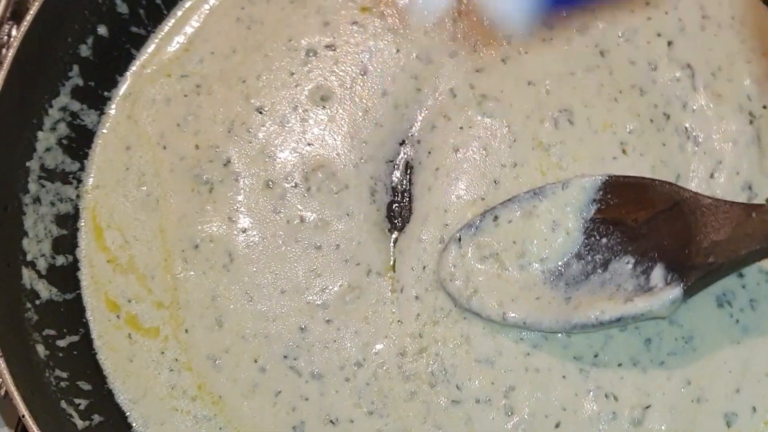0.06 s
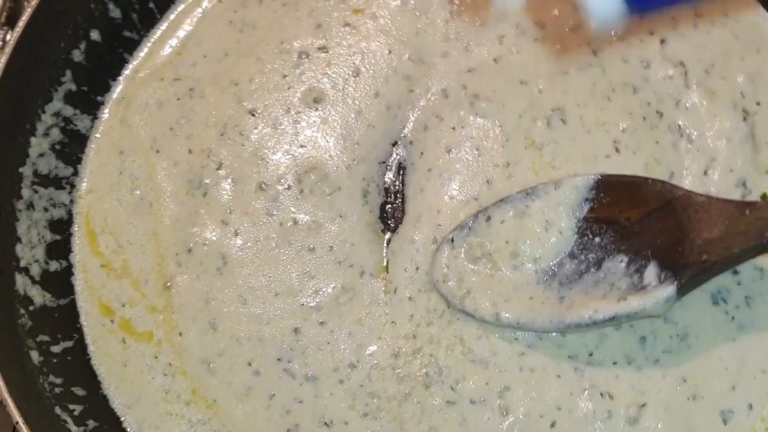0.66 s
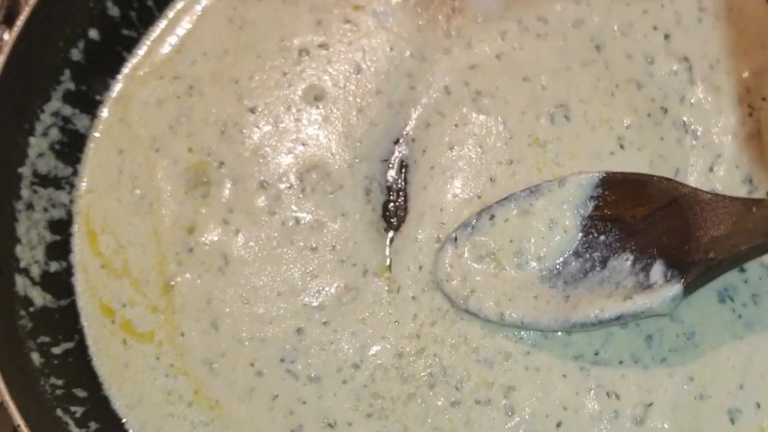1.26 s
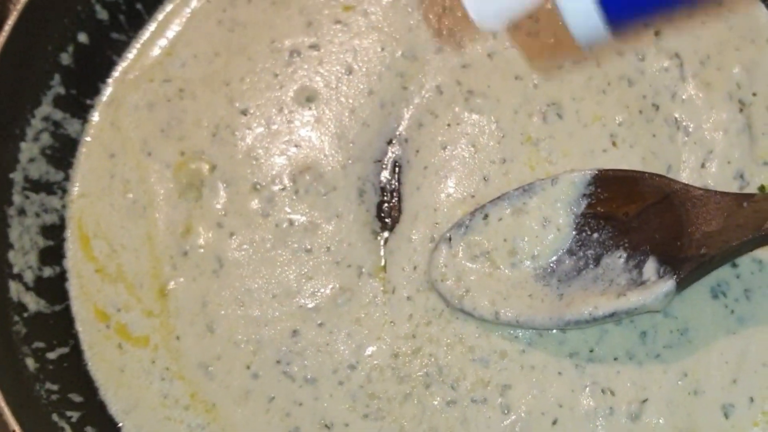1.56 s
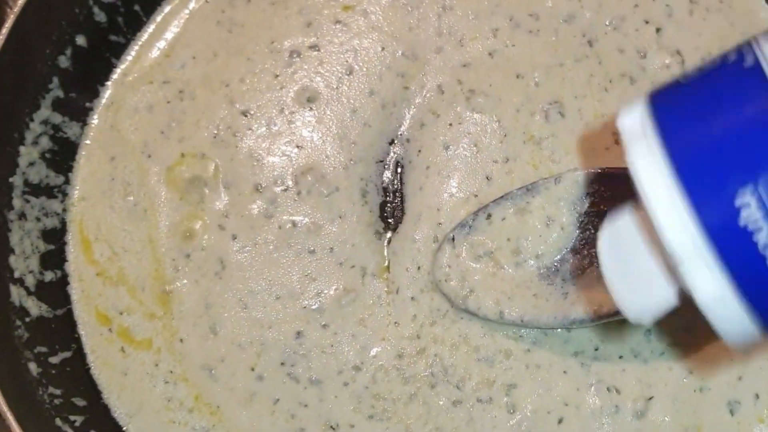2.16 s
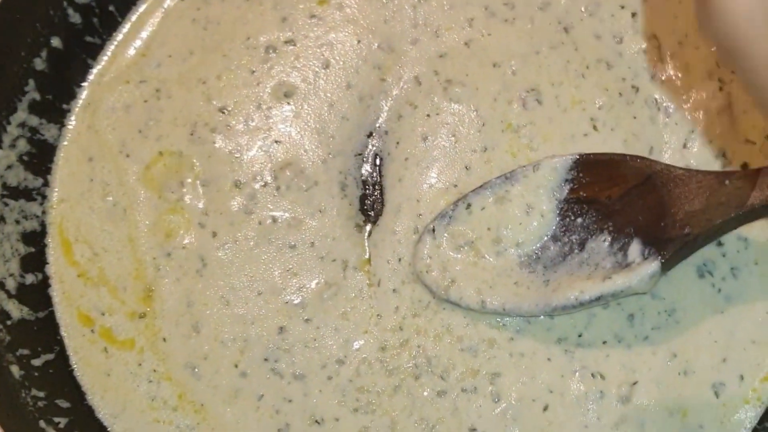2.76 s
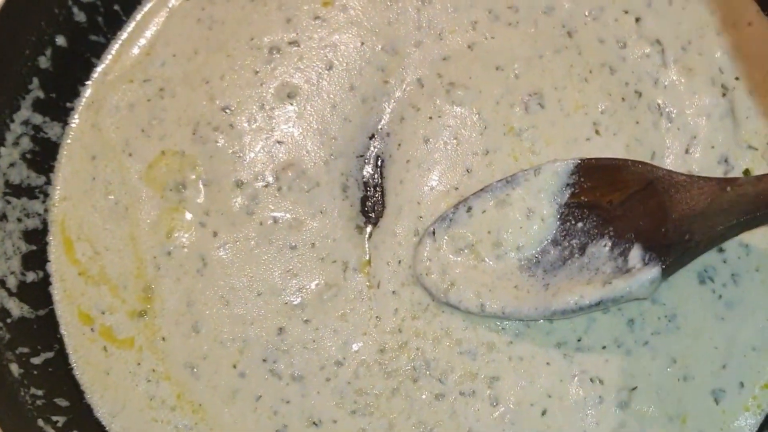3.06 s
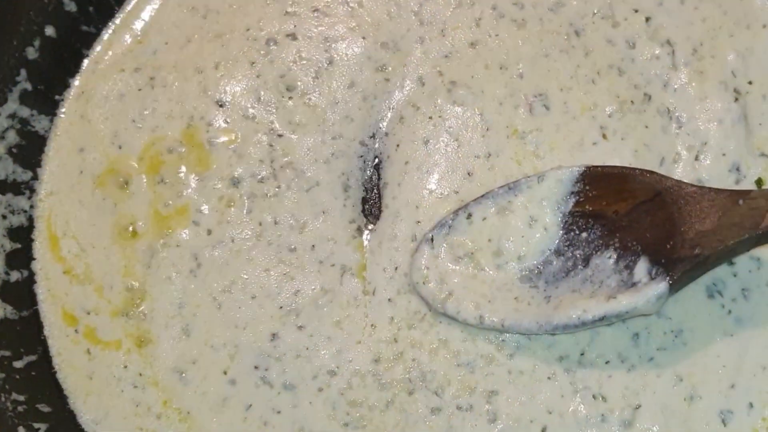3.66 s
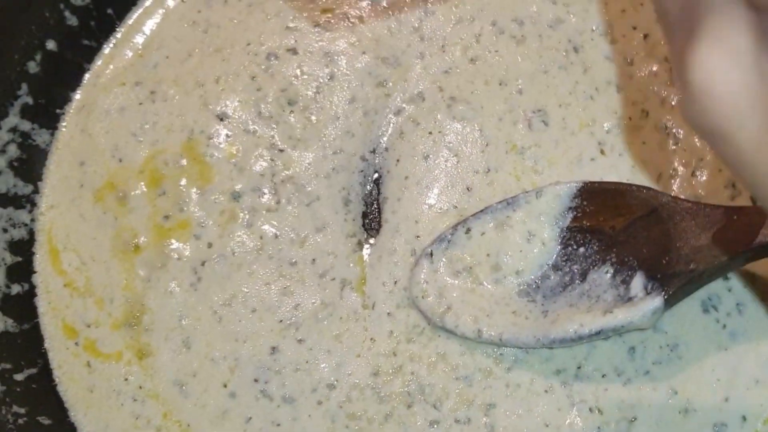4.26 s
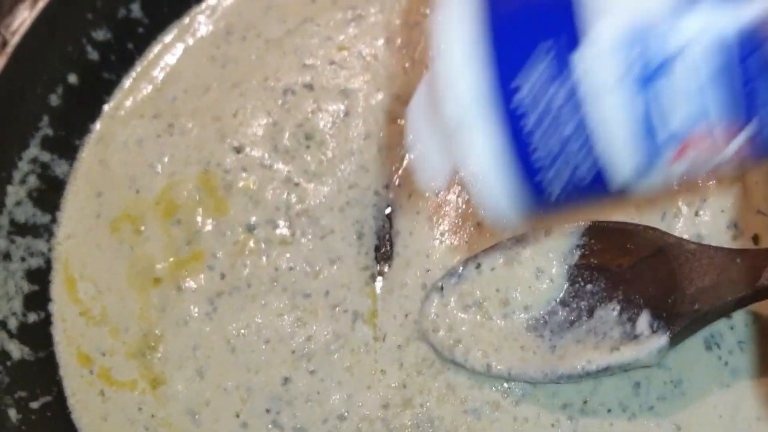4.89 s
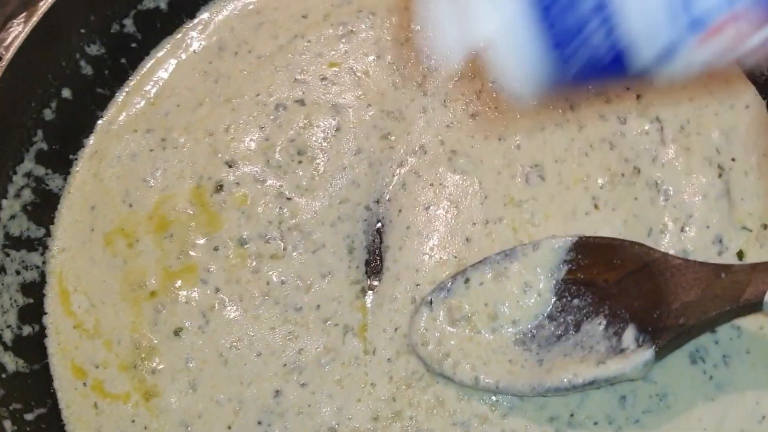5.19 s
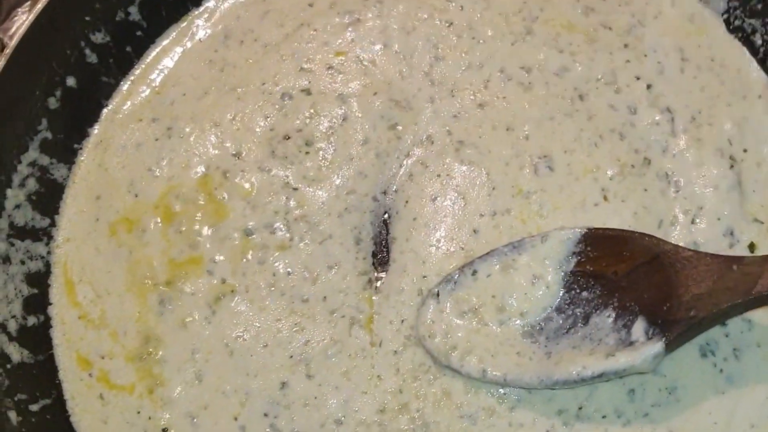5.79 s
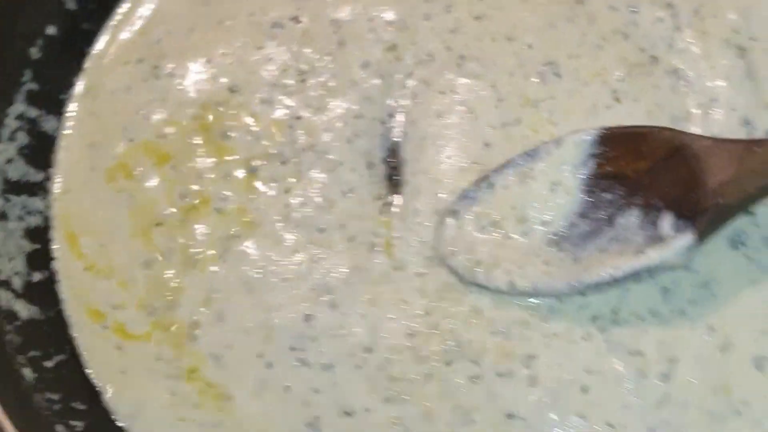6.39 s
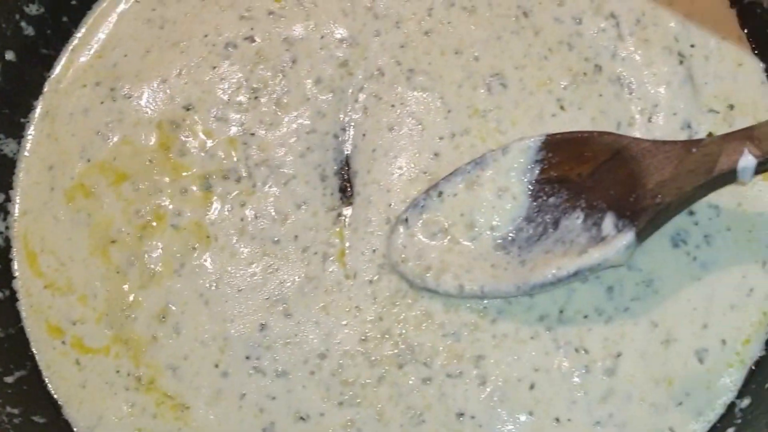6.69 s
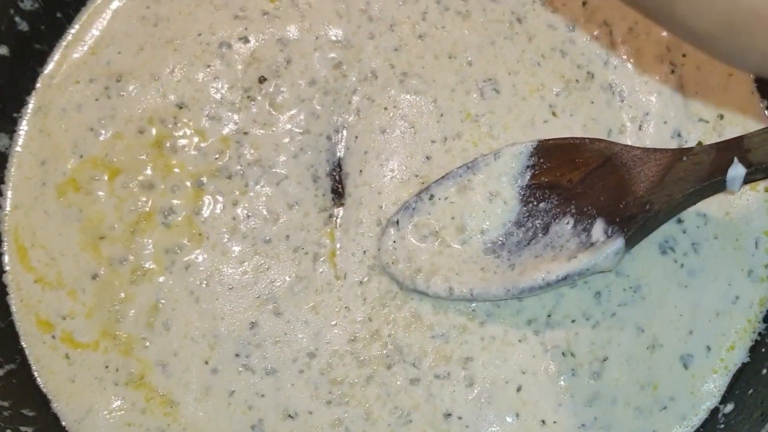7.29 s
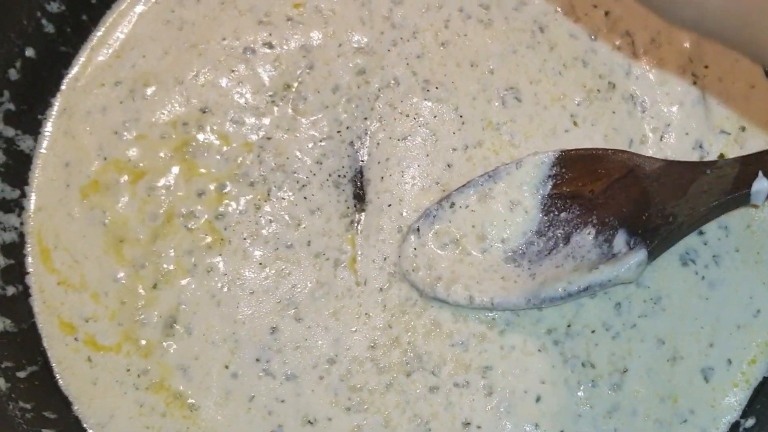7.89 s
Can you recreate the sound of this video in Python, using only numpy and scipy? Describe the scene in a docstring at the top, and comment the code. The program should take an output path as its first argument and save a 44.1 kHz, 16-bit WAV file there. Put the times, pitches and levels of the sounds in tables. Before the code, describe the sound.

In a home kitchen, salt is shaken from a tub close to the microphone, about ten gritty strokes a second. The shaking stops, a hand rubs and bumps the microphone, and a second round follows with a few sharp clacks of clumps. After another bump, a pan of cream sauce is left sizzling finely with small bubble pops. An appliance hums low throughout.

```python
"""Salting a simmering sauce

Salt is shaken from a tub, about ten strokes a second in two rounds: at each stroke the grains shower
against the wall and ring the hollow. Below it a pan of cream sauce sizzles finely and its bubbles pop,
while a kitchen appliance hums and rumbles behind. Twice the hand that holds the phone shifts its grip,
rubbing the case and bumping the right microphone."""
import sys
import numpy as np
from scipy import signal
from scipy.fft import rfft, irfft
from scipy.io import wavfile

SR = 44100
rng = np.random.default_rng(int(sys.argv[2]) if len(sys.argv) > 2 else 0)


def wrap_up_sound(samples):
    """Save the sound to the file named by the first command line argument, as 16-bit audio."""
    columns = np.atleast_2d(samples).T
    # keep every value between -1 and 1, then stretch to whole-number steps
    tamed = np.clip(columns, -1, 1)
    steps = np.round(tamed * 32767).astype(np.int16)
    wavfile.write(sys.argv[1], SR, steps)


N = 350154
TIME = np.arange(N) / SR


def undb(db):
    """Decibels to gain."""
    return 10 ** (np.asarray(db) / 20)


def unit(x):
    """Scale to rms 1."""
    return x / np.sqrt(np.mean(x ** 2))


def pan(db):
    """Constant-power gains, the left db above the right."""
    return unit(undb(np.array([[db], [-db]]) / 2))


def add(out, s, x):
    """Mix x into out from time s on."""
    i = max(int(s * SR), 0)
    out[..., i:i + x.shape[-1]] += x[..., :max(N - i, 0)]


def colour(x, points):
    """Minimum-phase EQ from (frequency [Hz], left [dB], right [dB]) points."""
    size = 16384
    hz, *sides = np.transpose(points)
    log_f = np.log(np.arange(size // 2 + 1) * SR / size + 1)
    gains = undb([np.interp(log_f, np.log(hz), db) for db in sides])
    cepstrum = irfft(np.log(gains))
    cepstrum[:, 1:size // 2] *= 2
    cepstrum[:, size // 2 + 1:] = 0
    return signal.fftconvolve(x, irfft(np.exp(rfft(cepstrum))), axes=1)[:, :N]


def walk(rate):
    """Smooth random wander of rms 1, about rate turns a second."""
    steps = signal.resample_poly(rng.standard_normal(int(rate * N / SR) + 2), 8, 1)
    return unit(np.interp(TIME * rate * 8, np.arange(len(steps)), steps))


def fade(t, t60):
    """Decay of 60 dB in t60 seconds."""
    return np.exp(-np.log(1000) * t / t60)


def swells(table):
    """Bell-shaped rises and falls from (time [s], level [dB], spread [s]) rows."""
    return sum(undb(db) * np.exp(-((TIME - s) / spread / 2) ** 2) for s, db, spread in table)


def grains(rate, scatter_db):
    """Random clicks of scattered size, rate a second, each with its own strength left and right."""
    out = np.zeros((2, N))
    at = np.flatnonzero(rng.random(N) < rate / SR)
    size, left, right = rng.standard_normal((len(at), 3)).T
    out[:, at] = undb(scatter_db * np.clip(size, -2, 2)) * np.array([left, right])
    return out


def snaps(table, spray_t60, ring_q, crack_db, gain_db, band_hz):
    """Each snap is a sudden, dying spray of tiny impacts that rings a small hollow for a few cycles."""
    out, t = np.zeros((2, N)), TIME[:SR // 10]
    band = signal.butter(2, band_hz, "band", fs=SR, output="sos")
    for s, db, hz, pan_db in table:
        spray = rng.laplace(size=(2, len(t))) * fade(t, spray_t60)
        ring = signal.lfilter(*signal.iirpeak(hz, ring_q, fs=SR), spray)
        snap = signal.sosfilt(band, ring + undb(crack_db) * spray)
        add(out, s, snap / np.abs(snap).max() * undb(db + gain_db) * pan(pan_db))
    return out


# Mains hum and motor orders: (frequency [Hz], level [dB])
HUM_PARTIALS = [(48.4, -52.5), (100, -44), (112.5, -51), (129, -50), (145, -57.5), (194, -67),
                (242.3, -73.5), (290.7, -60.5), (300, -58), (339.1, -58), (387.6, -58.5), (436, -63.5),
                (484.5, -66.5), (532.9, -86), (1550, -87), (1647, -81), (1745, -80), (1892, -87),
                (2035, -81.5)]
# EQ of the rumble and moving air, a faint hiss on top: (frequency [Hz], left [dB], right [dB])
AIR_EQ = [(25, -16, -39), (39.7, -41, -42.5), (59.4, -14, -0.5), (73, -28, -12.5), (97.6, -15, -8.5),
          (106.8, -5.5, -0.5), (129.8, -10.5, -7.5), (169.6, -37.5, -22), (255, -20, -23.5),
          (276, -21.5, -24.5), (673, -30, -27.5), (1300, -50.5, -42.5), (1610, -39.5, -39),
          (2470, -51.5, -44), (2880, -61, -54.5), (6500, -62, -51.5), (7900, -52, -48), (9600, -63, -61),
          (11500, -54.5, -52)]


def appliance(waver_db=-0.5, drift_rad=0.1, pan_db=-5, air_db=-44, mono_below_hz=700):
    """Mains and motor hum waver slightly over a bed of rumbling air, centred in the bass, wide above."""
    hum = 0
    for hz, db in HUM_PARTIALS:
        amplitude = np.sqrt(2) * undb(db + waver_db * walk(3.17))
        hum += amplitude * np.sin(2 * np.pi * (hz * TIME + rng.random()) + drift_rad * walk(2.56))
    centre = signal.lfilter(*signal.butter(1, mono_below_hz, fs=SR), rng.standard_normal(N))
    wide = signal.lfilter(*signal.butter(1, mono_below_hz, "high", fs=SR), rng.standard_normal((2, N)))
    return hum * pan(pan_db) + undb(air_db) * unit(colour(centre + wide, AIR_EQ))


# Swells of the low drone: (time [s], level [dB], spread [s])
DRONE_SWELLS = [(1.36, -37, 0.12), (2.01, -35.5, 0.041), (5.2, -35.5, 0.06), (7.92, -35.5, 0.072)]


def drone(hz=111, pan_db=-5):
    """A low tone comes and goes, beating against the hum."""
    return swells(DRONE_SWELLS) * np.sin(2 * np.pi * (hz * TIME + rng.random())) * pan(pan_db)


# Fingers dragging over the case: (time [s], relative level [dB], spread [s])
FINGER_RUBS = [(3.466, -32.5, 0.011), (3.550, -42.5, 0.019), (3.590, -38.5, 0.02), (6.138, -36.5, 0.021),
               (6.259, -29, 0.0066)]
# EQ of the dull friction: (frequency [Hz], left [dB], right [dB])
RUB_EQ = [(40, -40, 15), (150, -28, 0), (435, -29, -6.5), (647, -19, 3.5), (860, -38, -6),
          (1290, -40, -11.5), (3000, -49, -20.5), (5670, -62, -24.5), (8000, -46, -51), (15000, -64, -65)]


def rubbing(slips_per_s=5000, gain_db=-3):
    """Skin sticks and slips on the case while the grip shifts."""
    friction = unit(colour(grains(slips_per_s, scatter_db=-3), RUB_EQ))
    return friction * swells(FINGER_RUBS) * undb(gain_db)


# Modes of the phone's case: (frequency [Hz], relative level [dB], t60 [s])
CASE_MODES = [(62, -11, 0.038), (95, 3, 0.043), (165, -13, 0.018), (298, 5, 0.022), (453, -4.5, 0.04),
              (810, 5, 0.008), (1420, -4, 0.0074), (4200, -15, .0015)]
# Thuds of the hand: (time [s], peak [dB], contact [ms])
HAND_BUMPS = [(3.447, -20, 1.4), (3.457, -16.5, 0.66), (3.469, -15.5, 0.5), (3.475, -12.5, 2.7),
              (3.541, -15, .7), (3.548, -13.5, 1.07), (3.555, -6.5, 0.64), (3.559, -4, 0.34),
              (3.563, -8.5, 0.98), (3.575, -12, 1.9), (3.608, -24, 2.5), (6.12, -15, 0.96),
              (6.131, -12.5, 1.24), (6.146, -18.5, 0.64), (6.223, -16.5, 1.15), (6.2556, -0.5, 0.46),
              (6.260, 0.5, 0.75), (6.263, -3.5, 2.96)]
# Ticks of slipping skin: (time [s], relative level [dB])
SKIN_TICKS = [(3.5595, -15), (3.563, -23.5), (3.569, -24), (3.574, -21.5), (6.260, -14), (6.269, -14),
              (6.272, -13)]


def bumps(left_db=-27, tick_corner_hz=900, tick_top_hz=5000, tick_gain_db=3):
    """The hand knocks the case's damped modes, duller the longer the contact; slipping skin ticks."""
    out, t = np.zeros(N), TIME[:SR // 8]
    case = sum(undb(db) * fade(t, t60) * np.cos(2 * np.pi * hz * t) for hz, db, t60 in CASE_MODES)
    for s, db, contact_ms in HAND_BUMPS:
        age = t * 1000 / contact_ms
        push = age ** 3 * np.exp(-3 * age)
        thud = signal.fftconvolve(case, push)[:len(t)]
        add(out, s, -thud / np.abs(thud).max() * undb(db))
    slip = np.exp(-2 * np.pi * tick_corner_hz * t)
    tick = signal.lfilter(*signal.butter(2, tick_top_hz, fs=SR), slip)
    for s, db in SKIN_TICKS:
        add(out, s, -undb(db + tick_gain_db) * tick)
    return out * undb([[left_db], [0]])


# Level ride of the simmer: (time [s], relative level [dB])
SIMMER_RIDE = [(0, -56), (1.5, -63.5), (2.9, -57.5), (3.12, -78), (3.4, -83), (3.65, -65.5), (3.9, -67.5),
               (5.8, -57), (6.2, -63), (6.6, -59.5), (7.25, -60.5), (7.7, -53.5), (7.94, -59.5)]
# EQ of the fine fizz: (frequency [Hz], left [dB], right [dB])
SIZZLE_EQ = [(1000, -48, 5.5), (1930, -5, 10), (2880, -14, 8), (4280, -3, 1), (5000, -10, -3),
             (5770, -6, 1.5), (8440, -2.5, 4.5), (10300, -13, -30), (11100, -4, -5.5), (12500, -5, -4),
             (15300, -6, -6)]


def sizzle(bursts_per_s=110, flurry_hz=35, flurry_db=2, patch_db=4.5, froth_db=-6, gain_db=-2):
    """Tiny bubbles burst in flurries at the hot pan, a broad band for each size, over a fine froth."""
    fizz = 0
    for hz in np.linspace(2600, 15500, 18):
        bursts = grains(bursts_per_s, scatter_db=4) * undb(patch_db * walk(flurry_hz))
        fizz += unit(signal.lfilter(*signal.iirpeak(hz, Q=1, fs=SR), bursts))
    froth = undb(froth_db) * rng.standard_normal((2, N))
    simmer_db = np.interp(TIME, *np.transpose(SIMMER_RIDE)) + flurry_db * walk(flurry_hz)
    return unit(colour(unit(fizz) + froth, SIZZLE_EQ)) * undb(simmer_db + gain_db)


def crackle(count=80, over_simmer_db=9, scatter_db=2, centre_hz=8800, pan_db=-5):
    """Middling bubbles burst at random, spread over an octave and riding the level of the simmer."""
    times = (np.arange(count) + rng.random(count)) / count * N / SR
    rows = []
    for s, (size, octaves) in zip(times, rng.random((count, 2)) - .5):
        db = np.interp(s, *np.transpose(SIMMER_RIDE)) + over_simmer_db + scatter_db * size
        rows.append((s, db, centre_hz * 2 ** octaves, pan_db))
    return snaps(rows, spray_t60=0.051, ring_q=3.4, crack_db=-10, gain_db=3, band_hz=(2500, 13800))


# Spot pops in the sauce: (time [s], relative peak [dB], ring [Hz], left minus right [dB])
BUBBLE_POPS = [(1.399, -50, 7130, -4), (3.275, -57, 9000, 0), (3.682, -51, 8120, -4),
               (6.2951, -41, 7500, -7.0), (6.4085, -44.5, 2820, -10), (6.451, -49, 11400, -1),
               (6.528, -45, 7820, -2), (6.5465, -43, 7160, -6.5), (6.6328, -46, 6960, -5),
               (6.809, -45, 8300, -5), (6.956, -44.5, 7900, -7), (7.099, -46.5, 7700, -7),
               (7.1725, -50, 2860, -13), (7.5303, -48.5, 8100, -3), (7.8181, -43, 2730, -2),
               (7.9115, -46, 7300, -1)]


def pops():
    """The largest bubbles burst and spit."""
    return snaps(BUBBLE_POPS, spray_t60=0.08, ring_q=4.1, crack_db=-16, gain_db=3, band_hz=(1400, 13900))


# Hard accents in the shaking: (time [s], relative peak [dB], ring [Hz], left minus right [dB])
CLUMP_HITS = [(1.560, -36.5, 1810, -2), (3.903, -25.5, 8500, -1), (4.632, -27, 6400, -3),
              (5.224, -24, 7500, 0), (5.666, -34, 3270, -5), (5.900, -36.5, 8650, -3),
              (5.945, -34, 2200, 9), (5.958, -31.5, 2930, -2)]


def clumps():
    """Clumps of salt clack in the tub."""
    return snaps(CLUMP_HITS, spray_t60=0.095, ring_q=4.5, crack_db=-10, gain_db=-2, band_hz=(1400, 12000))


# Resonances of the tub: (frequency [Hz], width [Hz], relative level [dB])
TUB_MODES = [(2820, 340, -1), (6300, 400, -3.5), (7700, 900, 4.5)]


def tub_hollow(knocks_per_s=1200):
    """Knocking grains keep the hollow of the tub ringing."""
    knocks = grains(knocks_per_s, scatter_db=-1)
    return unit(sum(undb(db) * signal.lfilter(*signal.iirpeak(hz, hz / width, fs=SR), knocks)
                    for hz, width, db in TUB_MODES))


# Bouts of even shaking: (first throw [s], last throw [s], swings [count], first return [s],
# return over throw [dB], throw spread [s], return spread [s], brightness [dB], tub ring [dB])
SHAKE_BOUTS = [(0.095, 1.178, 6, 0.186, 0, 0.017, 0.015, -0.5, -8.5),
               (1.603, 1.811, 2, 1.733, -6, 0.011, 0.018, 1.5, -19),
               (2.02, 2.981, 6, 2.128, -1, 0.012, 0.012, -1.5, -9),
               (3.914, 4.529, 4, 4.036, -4, 0.014, 0.02, -0.5, -6),
               (4.727, 5.69, 6, 4.838, -0.5, 0.011, 0.018, -2, -10)]
# Vigour of the shaking: (time [s], level [dB])
SHAKE_RIDE = [(0, -48.5), (0.2, -43), (0.4, -41.5), (0.84, -34.5), (1.0, -37), (1.27, -45.5), (1.45, -52),
              (1.85, -47), (2.35, -43.5), (2.8, -46), (2.98, -50.5), (3.1, -74), (3.7, -72), (3.9, -46),
              (4.7, -40.5), (4.9, -47), (5.24, -41), (5.69, -47), (5.85, -81)]


def strokes(return_bright_db=1, pan_db=5.5, scatter_db=1.67):
    """Each swing throws the salt forward and back, never quite evenly: rows like those of TUB_TILTS."""
    rows = []
    for first, last, swings, first_back, back_db, spread, back_spread, bright, ring in SHAKE_BOUTS:
        for s in np.linspace(first, last, round(swings)):
            rows.append((s, 0, spread, bright, ring))
            rows.append((s + first_back - first, back_db, back_spread, bright + return_bright_db, ring))
    ride = np.transpose(SHAKE_RIDE)
    return [(s, np.interp(s, *ride) + db + rng.normal(0, scatter_db), spread, bright, pan_db, ring)
            for s, db, spread, bright, ring in rows]


# Single tilts, where the salt slides once:
# (time [s], level [dB], spread [s], brightness [dB], left minus right [dB], tub ring [dB])
TUB_TILTS = [(1.40, -58.5, 0.038, -1, 6, -12), (1.955, -55, 0.026, -4, 6, -19),
             (3.728, -49, 0.0072, 12, -1, -2), (3.845, -54.5, 0.007, 18, -1, -9),
             (3.943, -46, 0.015, 3, 0, -4), (5.939, -43, 0.016, 1, 4, -4.5),
             (5.976, -36.5, 0.0048, 5, 4, -6.5)]
# EQ of grains hitting the wall: (frequency [Hz], left [dB], right [dB])
SALT_EQ = [(474, -7, 1), (1240, -16, -6.5), (1610, -7.5, -7), (2480, -8.5, -8.5), (2730, -11.5, 2),
           (4800, -3, 1.5), (6260, -5, 3.5), (8200, -17.5, 6.5), (8600, 0, -0.5), (9460, -12.5, -16.5),
           (11130, -5.5, 1.5), (13500, -1, 3.5), (16000, -3, -4)]


def salt(grains_per_s=3500, split_hz=9500, ring_pan_db=-4, settle_t60=0.38, settle_db=-8):
    """At each stroke loose salt hits the wall as a dense shower of clicks, rings the tub and settles."""
    shower = unit(colour(grains(grains_per_s, scatter_db=-1), SALT_EQ))
    top = signal.lfilter(*signal.butter(2, split_hz, "high", fs=SR), shower)
    layers = np.array([shower - top, top, tub_hollow()])
    power = np.zeros((3, 2, N))  # body, top and hollow; left and right
    for s, db, spread, bright_db, pan_db, ring_db in strokes() + TUB_TILTS:
        near = slice(max(int((s - .1) * SR), 0), int((s + .1) * SR))
        stroke = np.exp(-.5 * ((TIME[near] - s) / spread) ** 2) * (undb(db) * pan(pan_db)) ** 2
        power[0, :, near] += stroke * undb(-bright_db)
        power[1, :, near] += stroke * undb(bright_db)
        power[2, :, near] += stroke * (undb(ring_db) * pan(ring_pan_db)) ** 2
    decay = fade(1 / SR, settle_t60) ** 2
    settling = undb(settle_db) ** 2 * signal.lfilter([1 - decay], [1, -decay], power)
    return np.sum(layers * np.sqrt(power + settling), axis=0)


def kitchen(x, t60=0.23, wet_db=-7):
    """Hob, tiles and cupboards return a short, diffuse tail."""
    t = TIME[:SR // 2]
    tail = rng.standard_normal((2, len(t))) * fade(t, t60) * (t > .002)  # 2 ms pre-delay
    tail /= np.sqrt(np.sum(tail ** 2, axis=1, keepdims=True))
    return x + undb(wet_db) * signal.fftconvolve(x, tail, axes=1)[:, :N]


def scene():
    """Sauce and salt sound in the room; the background bed and the handling noise stay dry."""
    bed = appliance() + drone()
    handling = bumps() + rubbing()
    cooking = pops() + crackle() + clumps() + salt() + sizzle()
    return bed + handling + kitchen(cooking)


def record(dry, low_cut_hz=40, high_cut_hz=15850):
    """The phone thins the deepest bass and cuts the top."""
    thinned = signal.sosfilt(signal.butter(2, low_cut_hz, "high", fs=SR, output="sos"), dry)
    return signal.sosfilt(signal.ellip(10, .2, 70, high_cut_hz, fs=SR, output="sos"), thinned)


dry = scene()
out = record(dry)
wrap_up_sound(out)
```